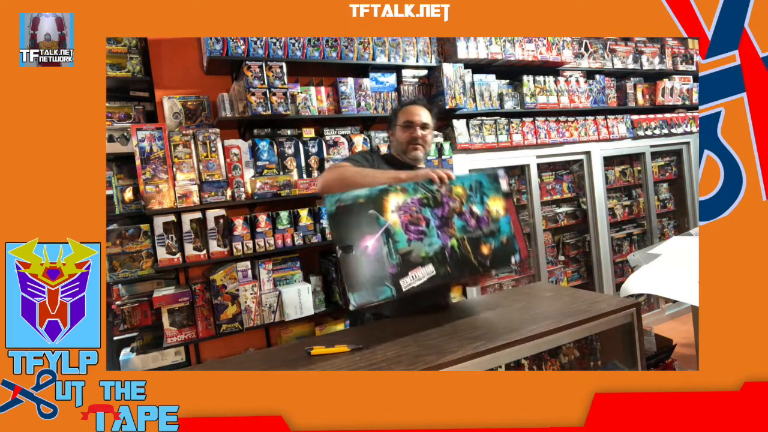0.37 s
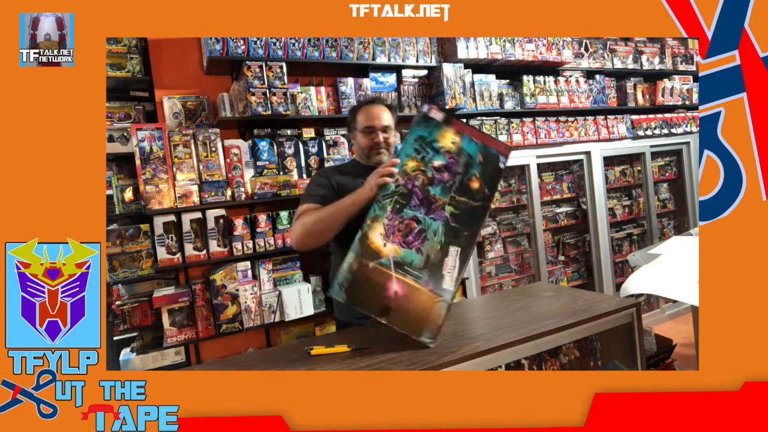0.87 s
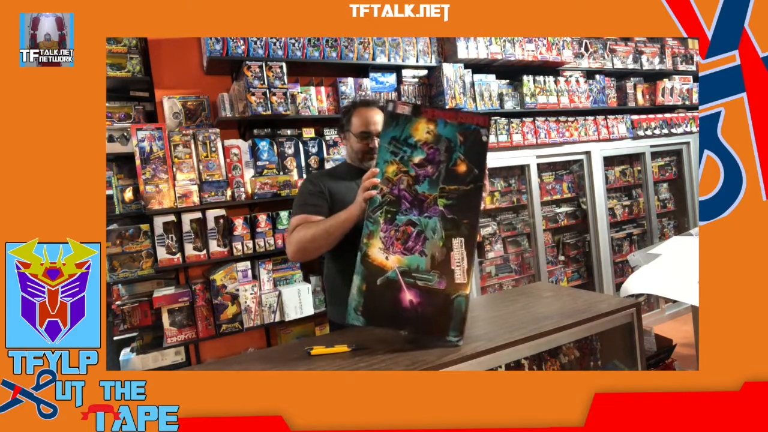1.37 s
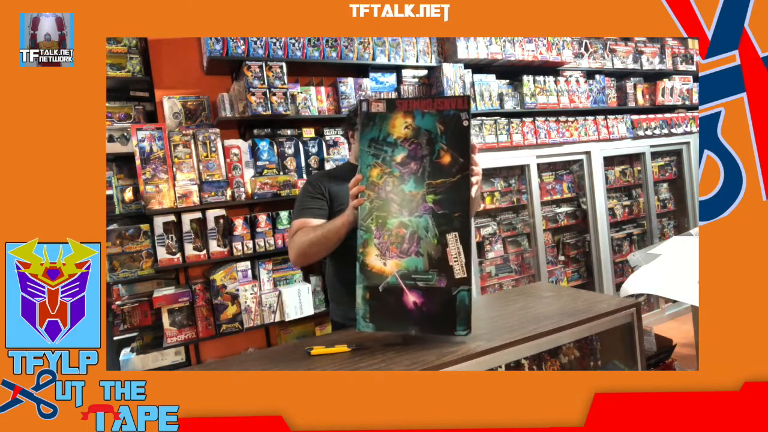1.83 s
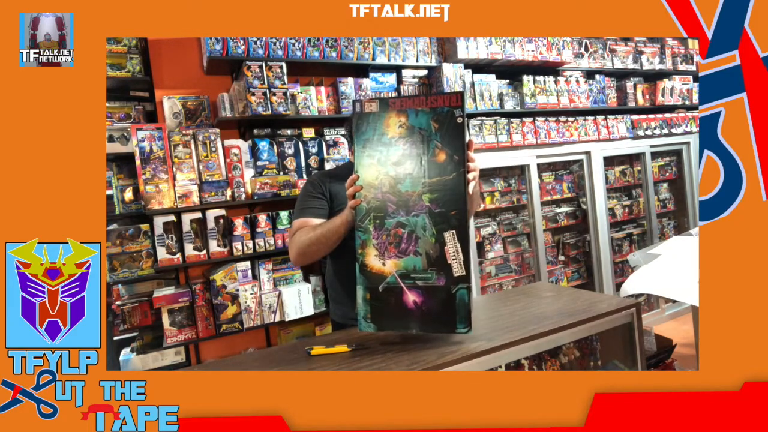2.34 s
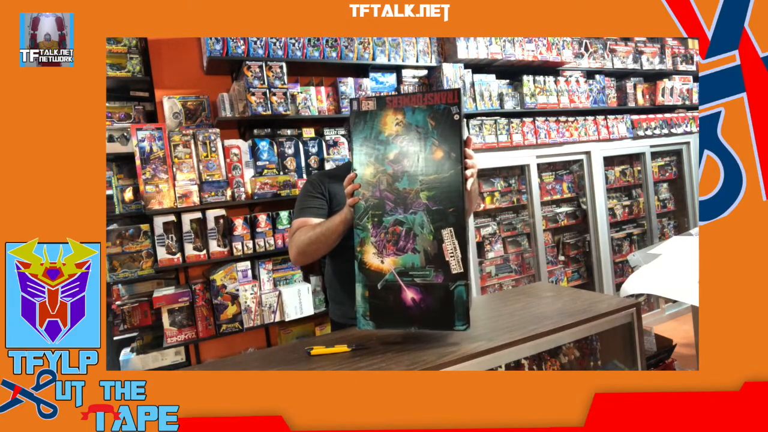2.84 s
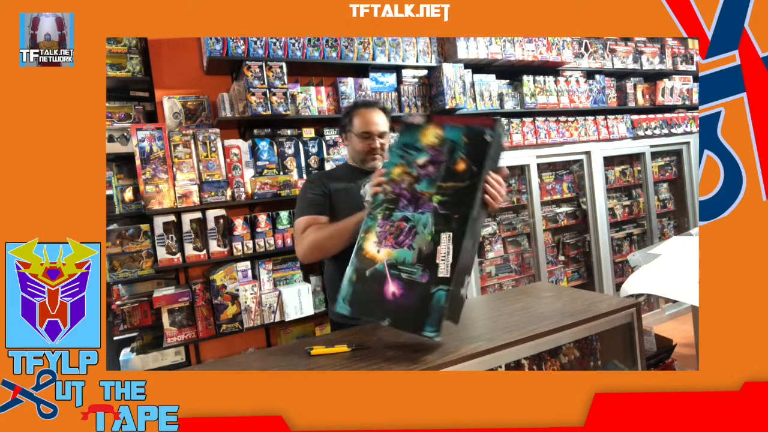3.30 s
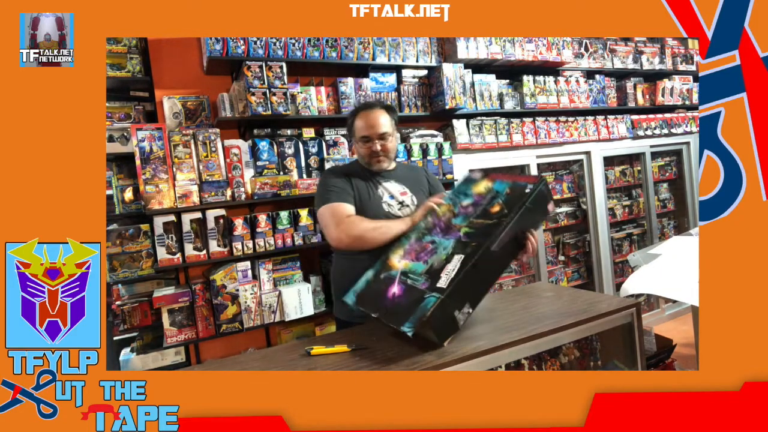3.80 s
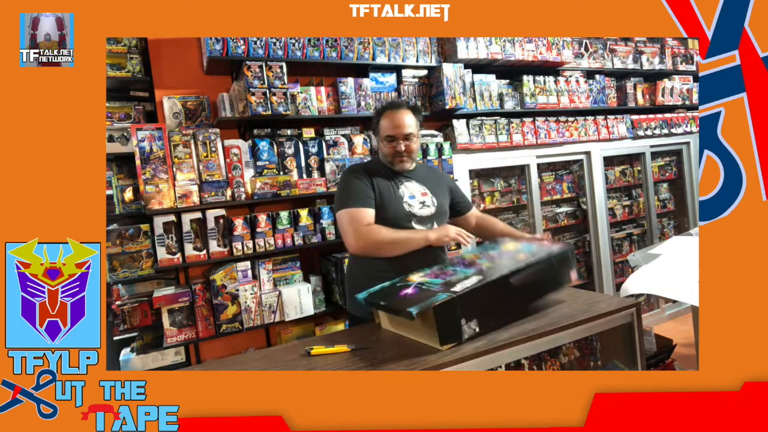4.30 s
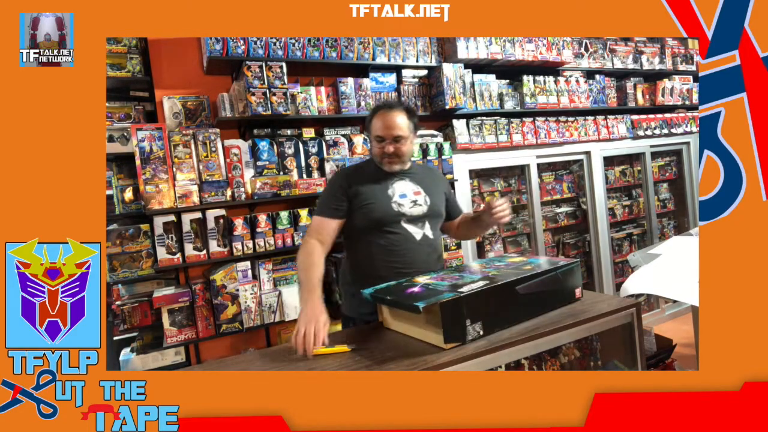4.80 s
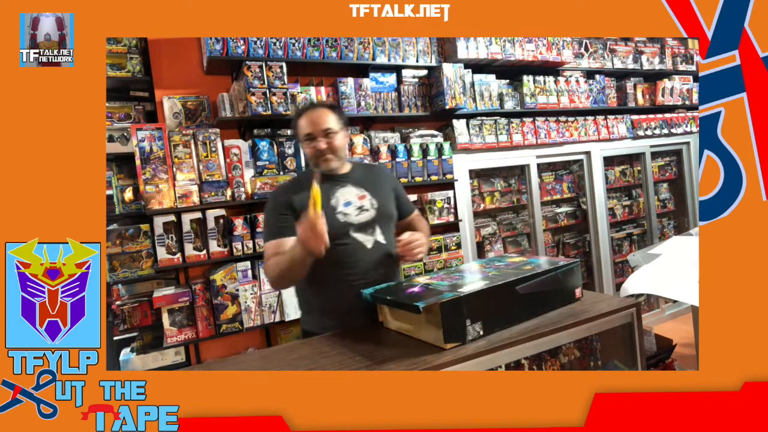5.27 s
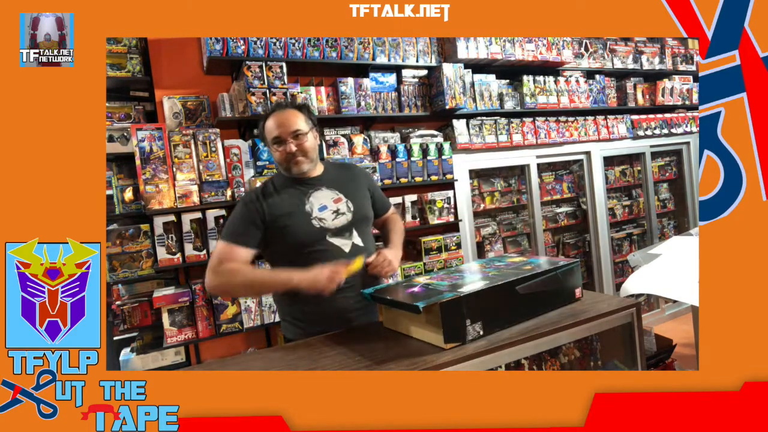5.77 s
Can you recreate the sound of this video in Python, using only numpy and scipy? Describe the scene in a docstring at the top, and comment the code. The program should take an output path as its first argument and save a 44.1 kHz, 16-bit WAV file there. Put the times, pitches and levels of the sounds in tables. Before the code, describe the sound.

In a small furnished room with faint steady room tone, a large cardboard box is handled with quiet rubs, bumps and palm brushes. Its inner box then slides in jerky, hissing scrapes. A short edge creak follows, then two heavy hollow knocks as it is laid on a counter. Last, a plastic knife is picked up with taps and bright ticks, and its slider ratchets out. Fairly close microphone, light bass.

```python
"""In a small furnished room, heard over a steady room tone, a large cardboard box is turned and stood on a
shop counter: rubbing noise and blows ring its walls, panels and flaps, palms hiss over it, its edge groans.
Its inner box then slides down in jerks, the edge creaks, and the whole is laid down with two heavy knocks.
Last a plastic knife is picked up off the counter with taps and ticks and its slider ratchets out.
The microphone thins the bass and upper treble; the converter clips what passes full scale."""
import sys
import numpy as np
from scipy import signal
from scipy.fft import rfft, irfft, next_fast_len
from scipy.io import wavfile
from scipy.ndimage import uniform_filter1d, map_coordinates

SR = 44100
rng = np.random.default_rng(int(sys.argv[2]) if len(sys.argv) > 2 else 0)


def invert_db(level):
    """Linear amplitude ratio for a level in decibels (20 dB per decade), elementwise."""
    return 10 ** (np.asarray(level, dtype=float) / 20)


def bounce(signal):
    """Save signal as a 16-bit WAV file at the path given by the first command-line argument."""
    frames = np.transpose(np.atleast_2d(signal))
    limited = np.clip(frames, -1, 1)
    pcm = np.round(limited * 32767).astype(np.int16)
    wavfile.write(sys.argv[1], SR, pcm)


N = 260179  # samples

# room tone spectrum: (frequency [Hz], relative density [dB per Hz])
ROOM_TONE = [(24, -56.5), (40, -5), (147, -9.5), (185, -13), (354, -13), (503, -13.5), (2100, -25.5),
             (7730, -30), (8990, -30.5), (15300, -29), (16100, -55)]
# cardboard rubbing, before judder and trim: (time [s], deep wall level [dB], fibre hiss level [dB])
RUB_LEVELS = [(0.0,-44.5,-58.5), (0.13,-50.5,-63), (0.19,-78,-64), (0.38,-58,-63.5), (0.45,-70,-58.5),
              (0.57,-50,-61), (0.84,-56,-62), (0.93,-51,-60), (1.2,-52,-67.5), (1.44,-52.5,-62),
              (1.66,-46,-48.5), (1.73,-53.5,-60.5), (1.9,-39,-39.5), (1.99,-45.5,-49), (2.05,-43,-40.5),
              (2.26,-39.5,-37.5), (2.58,-37.5,-40), (2.82,-35,-38.5), (3.06,-35.5,-37.5), (3.14,-52.5,-68),
              (3.36,-52,-59), (3.41,-44,-53.5), (3.62,-41.5,-48), (3.75,-43,-48.5), (3.855,-57.5,-47.5),
              (3.92,-40.5,-44), (4.08,-47,-52), (4.21,-53,-61), (4.45,-38.5,-39), (4.63,-51,-60.5),
              (4.8,-68.5,-81.5)]
# resonances of the box in three parts, large walls and cavity, panels, small flaps;
# contact widens them: (frequency [Hz], free width [Hz], level [dB])
BOX_PARTS = [
    [(119, 20, -7), (152, 18, -5), (215, 38.5, -2.5), (280, 30, -2), (359, 84, -8.5)],
    [(392.3, 16, -3), (455.7, 74.6, 4.5), (513, 84, 4), (614.7, 69.7, 6), (661, 140, 2), (834, 70.5, 0.5)],
    [(1018, 353, 5.5), (1085.4, 31, 10.5), (1138.7, 13.8, 5.5), (1393, 46, 9), (1475, 116, 2.5),
     (1860, 600, -1.5), (2360, 440, -6.5)],
]
# hiss of cardboard fibres: (frequency [Hz], relative density [dB per Hz])
FIBRE_HISS = [(1060, -52.5), (1800, -1.5), (3230, -5), (4170, -3), (5640, -8), (7290, -8), (8210, -7.5),
              (15300, -11.5), (16100, -36)]
# decay of the room: (frequency [Hz], time to fall 60 dB [s])
ROOM_DECAY = [(150, 0.4), (600, 0.21), (3000, 0.3), (12000, 0.24)]
# the counter takes the weight: (time [s], level before trim [dB])
COUNTER_THUDS = [(0.038, -35.5), (3.584, -19), (3.877, -22), (4.006, -26.5), (4.38, -7.5), (4.455, -51)]
# blows on the box, before trim: (time [s], deep level [dB], flaps over deep [dB], crack over deep [dB],
# contact [ms])
BOX_KNOCKS = [(0.041, -44.5, 7.5, -26, 16), (0.109, -38.5, 1, -11.5, 11), (0.23, -45.5, 3, -4, 3.6),
              (0.388, -38, -2.5, -11, 4.9), (0.434, -35.5, -21, -6, 5.3), (0.478, -31.5, -5.5, -25, 2.9),
              (0.627, -33.5, 2.5, -10, 7.9), (0.649, -33, 7.5, -4, 7), (1.31, -38.5, -2.5, -17, 19),
              (1.446, -39.5, -3, -10, 8.8), (1.533, -45, 9, 9, 4.9), (1.659, -43, 11, 4, 6.1),
              (1.745, -38.5, 3, -18, 4.8), (1.808, -40.5, 10, 8, 4.5), (1.895, -36, -8, 5, 4.4),
              (3.184, -38.5, 5, -21, 4.2), (3.255, -34.5, -2.5, -5, 8.4), (3.385, -30.5, -2, -29, 12.7),
              (3.548, -34.5, 1, -11, 8), (3.579, -22.5, -7.5, -9.5, 4.4), (3.867, -1, 1, -4.5, 3.94),
              (4.003, -17.5, -22, -22, 7.7), (4.108, -34, -4.5, -2, 3.9), (4.241, -34, 3.5, -3.5, 7.4),
              (4.304, -24.5, -3, -1.5, 7.2), (4.362, -20.5, -7, -7, 6.2), (4.374, -3.5, -8.5, -15, 2.66),
              (4.393, -5, -11, -12, 4.1), (4.455, -22.5, 5, -4.5, 6.1)]
# palms brushing the printed face: (time [s], peak [dB], centre [Hz], length [ms])
PALM_BRUSHES = [(0.14, -51.5, 13000, 13), (0.588, -52, 13000, 9), (0.78, -58, 12500, 10),
                (1.003, -46, 13000, 14), (0.876, -35.5, 1860, 70), (1.073, -41.5, 8700, 12.4),
                (1.195, -40.5, 4770, 10), (1.448, -35.5, 1760, 19), (1.746, -32, 1910, 18),
                (3.388, -50.5, 1330, 66), (4.24, -37.5, 1960, 19)]
# the box edge groans on the counter: (time [s], length [s], slip rate at start [Hz], at the loudest [Hz],
# at end [Hz], level at the loudest [dB])
EDGE_CREAKS = [(1.1, 0.17, 218, 205, 222, -45), (3.46, 0.1, 266, 250, 295, -28),
               (3.705, 0.085, 290, 250, 220, -37)]
# harmonics of a creak, each wavering: (multiple of the slip rate, mean level [dB])
CREAK_OVERTONES = [(1, 3), (2, -9.5), (3, -17.5), (4, -17.5), (5, -24)]
# the inner box catches and lets go, before trim: (time [s], flaps level [dB], crack over flaps [dB])
SLIDE_JERKS = [(2.02, -46.5, 7), (2.182, -26, 3.5), (2.229, -25, -24), (2.287, -32, 3), (2.368, -22, 0),
               (2.449, -21, -11), (2.526, -20.5, -25), (2.589, -18.5, -3.5), (2.643, -19.5, 0),
               (2.713, -24, -12.5), (2.753, -24.5, 3), (2.811, -23, 2.5), (2.863, -22, -4),
               (2.929, -20.5, -7), (3.01, -22.5, -3.5), (3.093, -24.5, -5)]
# knife dragged, turned in the hand, slider pushed: (time [s], rise [s], hold [s], level [dB], fade [dB/s])
KNIFE_DRAGS = [(4.823, 0.002, 0.05, -51, 900), (4.864, 0.008, 0.0007, -42, 345),
               (4.925, 0.0068, 0.0018, -19, 600), (4.955, 0.005, 0.001, -64, 250),
               (5.0, 0.12, 0.36, -56, 292), (5.391, 0.003, 0.115, -27, 899)]
# hiss and tick of hard plastic: (frequency [Hz], relative density [dB per Hz])
PLASTIC_HISS = [(410, -25), (700, -21), (946, -13), (1110, -13.5), (1460, -6.5), (1840, -4), (2590, -0.5),
                (3280, -0.5), (4150, 0.5), (6570, -0.5), (8420, -2.5), (15300, -4.5), (16100, -37)]
# fingers and knife tap the counter top: (time [s], peak [dB], contact [ms])
COUNTER_TAPS = [(4.826, -42.5, 11), (4.846, -31, 11.4), (4.881, -21.5, 6.2), (4.899, -25.5, 8.7),
                (4.945, -34.5, 5.4)]
# resonances of the counter top: (frequency [Hz], width [Hz], level [dB])
COUNTER_MODES = [(191, 130, -9), (347, 64, -2.5), (610, 68, -0.5), (1170, 110, -3)]
# knife clicks: (time [s], tick peak [dB], tilt [dB per octave])
KNIFE_CLICKS = [(4.8702, -7, -2), (4.9281, -16, 4), (4.9349, -9.5, -0.5), (4.9811, -11, -1),
                (5.1208, -33.5, -3.5), (5.1627, -20, -1), (5.298, -40, -10), (5.3338, -28.5, -4),
                (5.374, -28.5, -5), (5.382, -28, -6), (5.3939, -18, 3), (5.4855, -11, 6), (5.5046, -5, 2)]
# the hollow handle rings: (frequency [Hz], width [Hz], level before the grip alters it [dB])
HANDLE_MODES = [(1900, 260, 1), (3450, 600, -2), (4700, 600, -2), (6700, 900, 0)]


def unit(x):
    """Scale to rms 1."""
    return x / np.sqrt(np.mean(x ** 2) + 1e-20)


def along(points, hz):
    """Interpolate (Hz, value) points on a log frequency axis."""
    f, v = np.transpose(points)
    return np.interp(np.log(hz + 1), np.log(f + 1), v)


def curves(rows, outside=None):
    """One value per sample for each column after the time."""
    times, *columns = np.transpose(rows)
    now = np.arange(N) / SR
    return [np.interp(now, times, column, outside, outside) for column in columns]


def wobble(rate):
    """A smooth random curve, rate knots a second."""
    knots = rng.standard_normal(int(N * rate / SR) + 4)
    return map_coordinates(knots, [np.arange(N) * rate / SR])


def filtered(x, response):
    """x through a complex response of frequency."""
    m = next_fast_len(len(x) + 8192)
    return irfft(rfft(x, m) * response(np.fft.rfftfreq(m, 1 / SR)), m)[:len(x)]


def colour(points, tilt_db=0):
    """A spectrum with nothing up to its first point, tilted about 4 kHz in dB per octave."""
    def response(f):
        tilt = tilt_db * np.log2((f + 1) / 4000)
        return invert_db(along(points, f) + tilt) * (f > points[0][0])
    return response


def resonances(modes, damping=1):
    """Causal response of a set of resonances; contact with hand or counter widens them."""
    def response(f):
        total = 0
        for k, (centre, width, db) in enumerate(modes):
            mode = 1j * f * width / (centre * centre - f * f + 1j * f * width * damping)
            total = total + (-1) ** k * invert_db(db) * mode
        return total
    return response


def burst(t, length_ms):
    """A crumpling contact: noise with a quick rise and exponential fall, evened out across frequency."""
    u = t / (length_ms / 1000 + 1e-4)
    noise = rng.standard_normal(len(t)) * (1 - np.exp(-u * 9)) * np.exp(-u)
    z = rfft(noise)
    even = z / (np.abs(z) + 0.15 * np.abs(z).mean())
    return irfft(even, len(t)) * np.exp(-u / 4)


def add(out, s, x, db):
    """Mix x in at time s with the given peak."""
    out[round(s * SR):][:len(x)] += invert_db(db) * x / np.abs(x).max()


def gritty(spread_db, rate):
    """Friction force: noise whose grains catch with uneven size."""
    return rng.standard_normal(N) * invert_db(spread_db * wobble(rate))


def room_tone():
    """Steady coloured noise of the room, its level wavering slightly."""
    noise = unit(filtered(rng.standard_normal(N), colour(ROOM_TONE)))
    return noise * invert_db(-61.5 + 0.7 * wobble(7))


def rubbing():
    """Catching fibres drive walls, panels and flaps and hiss directly; a firm rub holds the largest walls."""
    firm_db = -44.5
    deep_db, hiss_db = curves(RUB_LEVELS, -120)
    panels_db = firm_db - 3 + 1.75 * (deep_db - firm_db)  # panels swing wider than the walls
    flaps_db = hiss_db + 0.5
    judder = invert_db(0.7 * wobble(22))
    body = np.zeros(N)
    for modes, db in zip(BOX_PARTS, (deep_db, panels_db, flaps_db)):
        body += unit(filtered(gritty(5.2, 250), resonances(modes))) * invert_db(db)
    held = np.clip((deep_db - firm_db) / 5.5, 0, 1)  # strongest 5.5 dB over a firm rub
    largest = filtered(body, lambda f: 1 / (1 + (f / 190) ** 8))
    hiss = unit(filtered(gritty(2.6, 200), colour(FIBRE_HISS))) * invert_db(hiss_db + 0.35)
    return judder * (body - 0.8 * held * largest + hiss)


def room_tail(x, step=SR // 10):
    """Diffuse tail, each band dying at its own speed, drawn anew for every tenth of a second."""
    out = np.zeros(N + SR)
    for a in range(0, N, step):
        hz, t, z = signal.stft(rng.standard_normal(SR // 2), SR, nperseg=256)
        decay = invert_db(-60 * t / along(ROOM_DECAY, hz)[:, None])
        tail = signal.istft(z * decay, SR, nperseg=256)[1]
        piece = np.pad(x, (0, step))[a:a + step]
        answer = signal.fftconvolve(piece, tail / np.linalg.norm(tail))
        out[a + 200:][:step + len(tail) - 1] += answer  # the tail sets in 200 samples late
    return out[:N]


def thuds():
    """The counter thumps under weight; the pitch drops towards 70 Hz as it settles."""
    out, t = np.zeros(N + SR), np.arange(SR // 4) / SR
    cycles = 70 * t + 0.97 * (1 - np.exp(-t / 0.0027))
    thump = np.sin(2 * np.pi * cycles) * (1 - np.exp(-t / 0.018)) * np.exp(-t / 0.014)
    for s, db in COUNTER_THUDS:
        add(out, s, thump, db - 5.5)
    return out[:N]


def box_blows(blows):
    """Each contact rings every part of the box and cracks at the edge."""
    out, t = np.zeros(N + SR), np.arange(SR // 4) / SR
    for s, db, flap_db, crack_db, ms in blows:
        push = burst(t, ms)
        panel_db = 1.16 + 0.63 * flap_db  # the panels lie between walls and flaps
        levels = (db, db + panel_db, db + flap_db)
        for modes, level, damping in zip(BOX_PARTS, levels, (1.2, 1.8, 2.5)):
            top = modes[-1][0]

            def part(f):
                # a blow favours the upper modes of each part; soft card passes little above them
                tone = (1 + 1j * f / (0.66 * top)) / (1 + 1j * f / (1.63 * top)) ** 3
                return resonances(modes, damping)(f) * tone

            add(out, s, filtered(push, part), level - 1)
        crack_ms = ms * (2.07 + max(0, -flap_db) / 4)  # dull blows crumple longer
        add(out, s, filtered(burst(t, crack_ms), colour(FIBRE_HISS)), db + crack_db - 1)
    return out[:N]


def knocks():
    """The box strikes the counter and is handled, light contacts and heavy blows alike."""
    return box_blows(BOX_KNOCKS)


def palms():
    """Skin skids over glossy card: a grainy band of hiss that starts sharply."""
    out, t = np.zeros(N + SR), np.arange(SR // 3) / SR
    for s, db, hz, ms in PALM_BRUSHES:
        skin = resonances([(hz, 0.9 * hz, 0)])
        add(out, s, filtered(burst(t, ms), lambda f: skin(f) ** 2), db)
    return out[:N]


def creaks():
    """Stick-slip at a nearly regular rate: a rough harmonic stack."""
    out = np.zeros(N)
    for s, length, start_hz, mid_hz, end_hz, db in EDGE_CREAKS:
        rows = [(s, start_hz, db - 9), (s + length * 0.6, mid_hz, db), (s + length, end_hz, db - 9)]
        slip_hz = curves(rows)[0]
        level_db = curves(rows, -120)[1]  # silent outside the creak
        phase = 2 * np.pi * np.cumsum(slip_hz * (1 + 0.03 * wobble(81))) / SR
        stack = np.zeros(N)
        for k, level in CREAK_OVERTONES:
            stack += invert_db(level + 3 * wobble(60)) * np.sin(k * phase)
        out += uniform_filter1d(invert_db(level_db), size=400) * stack
    return out


def slide_jerks():
    """The inner box catches and lets go as it slides, each release a short blow on the card."""
    contact_ms, walls_under_flaps_db = 7.5, 9.5
    blows = []
    for s, flaps_db, crack_db in SLIDE_JERKS:
        deep_db = flaps_db - walls_under_flaps_db
        crack_over_deep_db = crack_db + walls_under_flaps_db
        blows.append((s, deep_db, walls_under_flaps_db, crack_over_deep_db, contact_ms))
    return box_blows(blows)


def knife_drag():
    """Plastic dragged and its slider pushed: gritty friction hiss that swells and fades."""
    now, push = np.arange(N) / SR, np.zeros(N)
    for s, rise, hold, db, fade in KNIFE_DRAGS:
        swell = np.clip((now - s) / rise, 0, 1) ** 2
        push += swell * invert_db(db - fade * np.clip(now - s - rise - hold, 0, 1))
    return push * unit(filtered(gritty(4.6, 250), colour(PLASTIC_HISS)))


def taps():
    """Light taps ring the counter top."""
    out, t = np.zeros(N + SR), np.arange(SR // 5) / SR
    for s, db, ms in COUNTER_TAPS:
        top = filtered(burst(t, ms), lambda f: resonances(COUNTER_MODES)(f) / (1 + 1j * f / 1500) ** 2)
        add(out, s, top, db)
    return out[:N]


def plastic_ticks(ticks):
    """Hard plastic ticks that ring the hollow handle; the grip alters each resonance every time."""
    out, t = np.zeros(N + SR), np.arange(SR // 10) / SR
    tick_ms, grip_db, ring_db = 1.3, 3, -7  # ring level is relative to the tick
    for s, db, tilt_db in ticks:
        add(out, s, filtered(burst(t, tick_ms), colour(PLASTIC_HISS, tilt_db)), db)
        gripped = [(hz, width, level + rng.normal(0, grip_db)) for hz, width, level in HANDLE_MODES]
        add(out, s, filtered(burst(t, tick_ms), resonances(gripped)), db + ring_db)
    return out[:N]


def knife_clicks():
    """The knife ticks as it is picked up and worked."""
    return plastic_ticks(KNIFE_CLICKS)


def ratchet(count=6):
    """The slider hops over evenly spaced teeth, on average each harder, each of its own colour."""
    first_s, spacing_s = 5.4112, 0.0121
    teeth = []
    for k, (force, tint) in enumerate(rng.standard_normal((count, 2))):
        peak_db = -17 + 1.47 * k + 1.7 * force
        teeth.append((first_s + k * spacing_s, peak_db, 2 + 2 * tint))
    return plastic_ticks(teeth)


def scene():
    """Box and knife on the counter, with the room's answer, over its steady tone."""
    air = room_tone()
    box = rubbing() + thuds() + knocks() + palms() + creaks() + slide_jerks() + taps()
    knife = knife_drag() + knife_clicks() + ratchet()
    tail = room_tail(invert_db(-4) * box + invert_db(-4.5) * knife)
    return (box + knife + tail + air)[None]


def low_pass(x):
    """Removes everything above the highest recorded frequency."""
    return signal.sosfilt(signal.butter(12, 16500, fs=SR, output="sos"), x)


def record(dry):
    """The microphone drops the deepest bass and steps down 5 dB near 7.9 kHz; the converter clips."""
    def microphone(f):
        bass_cut = (1j * f / (1j * f + 45)) ** 2
        return bass_cut * invert_db(-5 / (1 + np.exp((7900 - f) / 150)))

    heard = filtered(dry[0], microphone)
    mix = np.clip(heard, -1, 1)[None]
    return low_pass(mix)


dry = scene()
out = record(dry)
bounce(out)
```